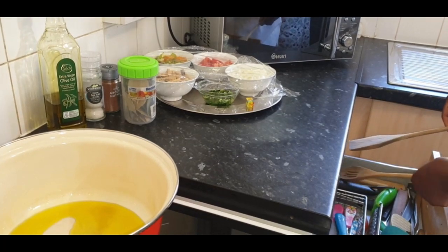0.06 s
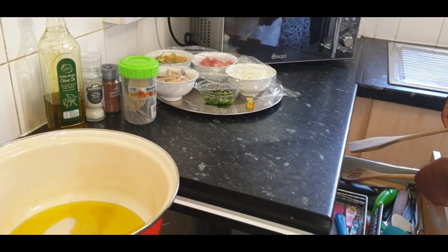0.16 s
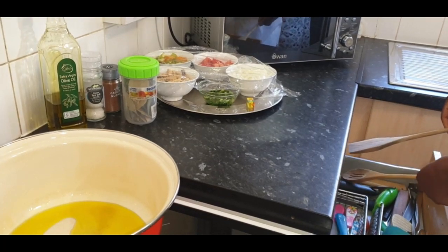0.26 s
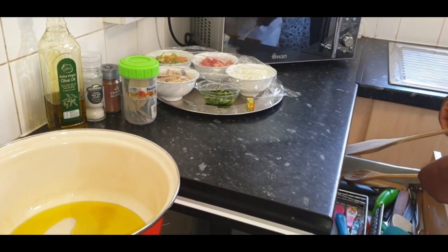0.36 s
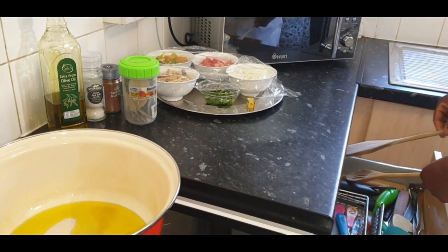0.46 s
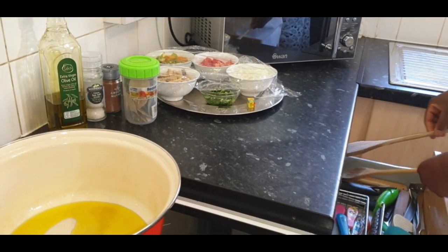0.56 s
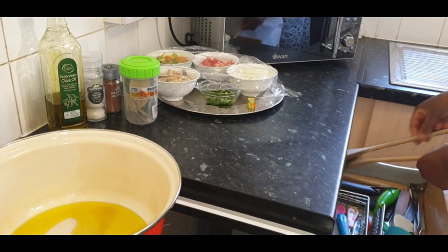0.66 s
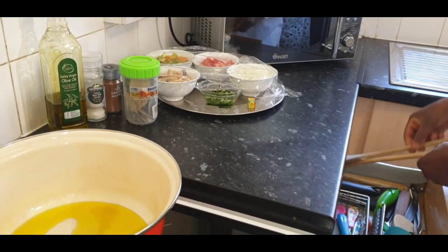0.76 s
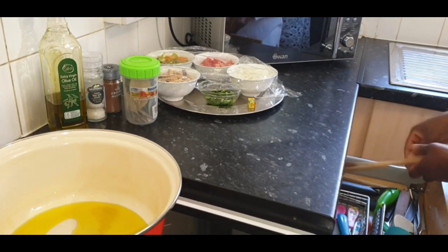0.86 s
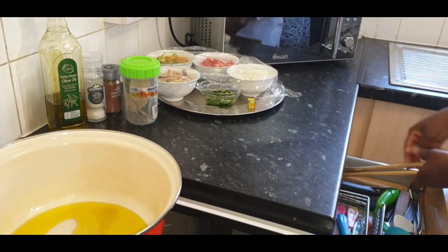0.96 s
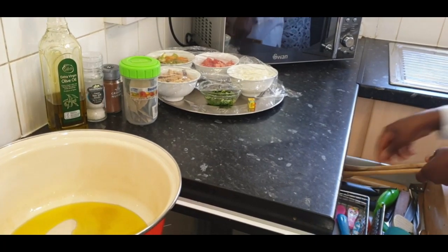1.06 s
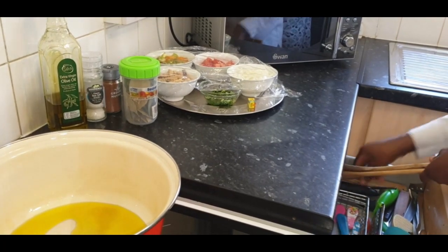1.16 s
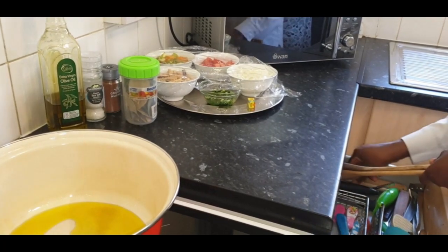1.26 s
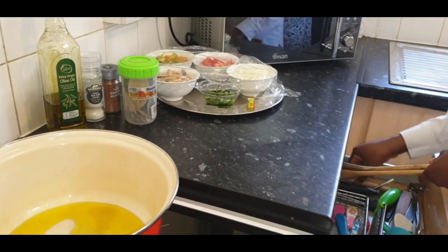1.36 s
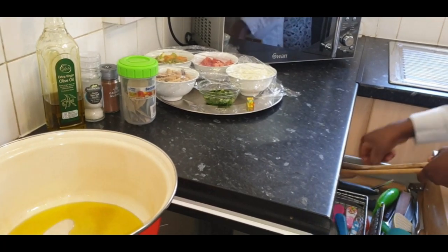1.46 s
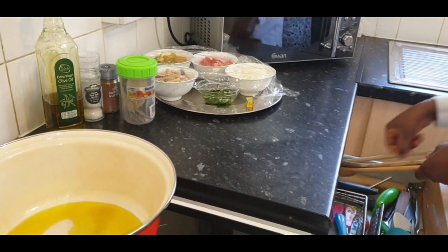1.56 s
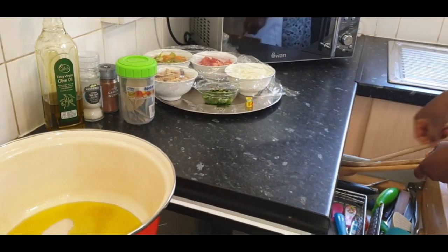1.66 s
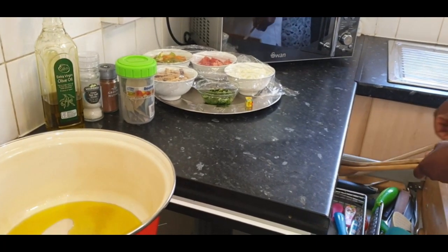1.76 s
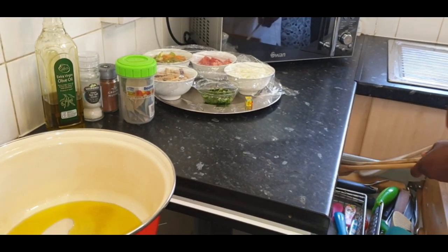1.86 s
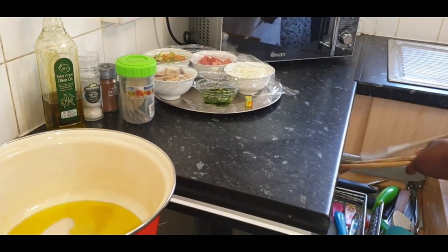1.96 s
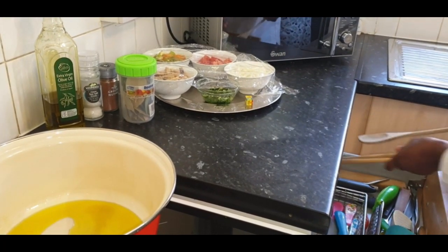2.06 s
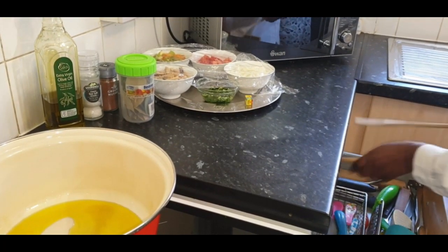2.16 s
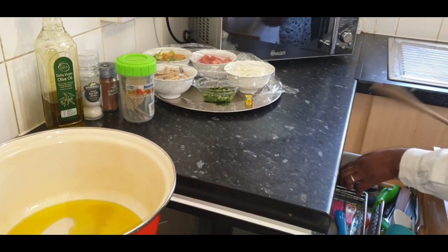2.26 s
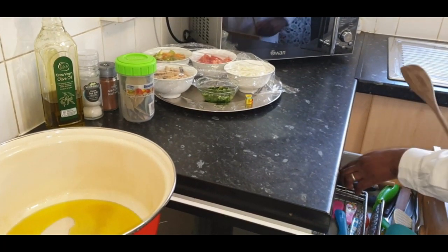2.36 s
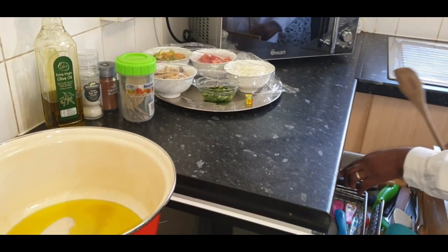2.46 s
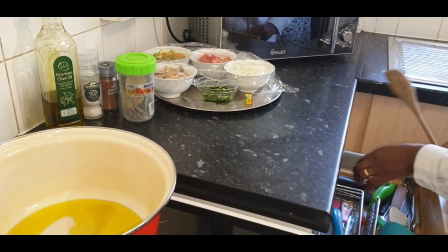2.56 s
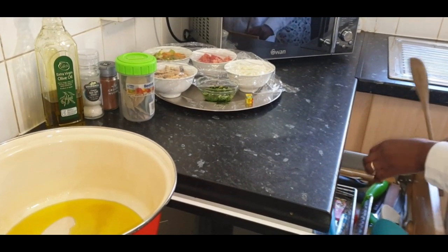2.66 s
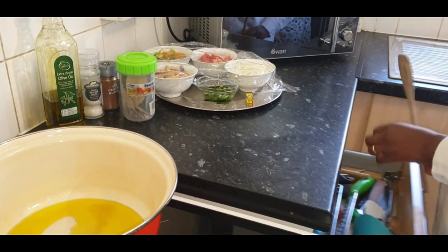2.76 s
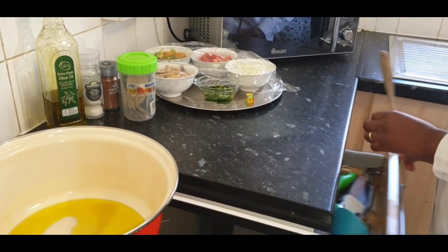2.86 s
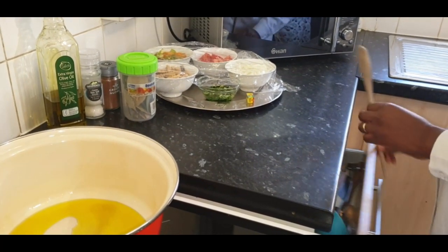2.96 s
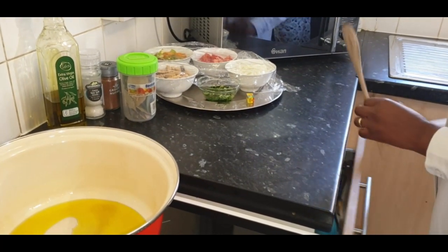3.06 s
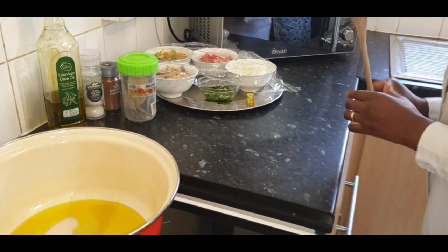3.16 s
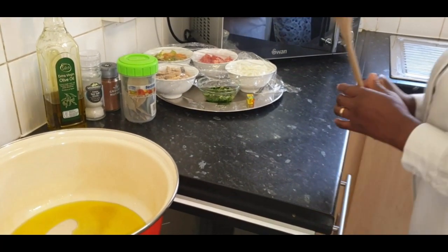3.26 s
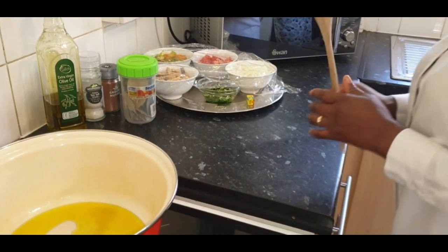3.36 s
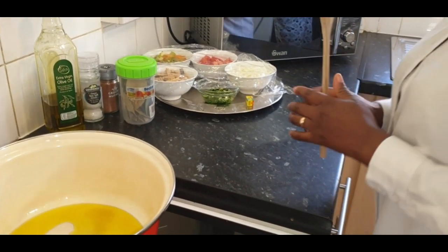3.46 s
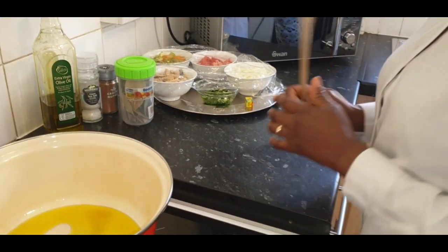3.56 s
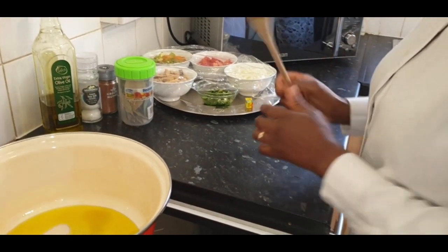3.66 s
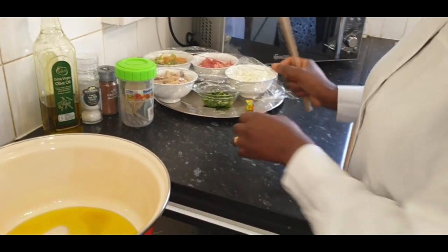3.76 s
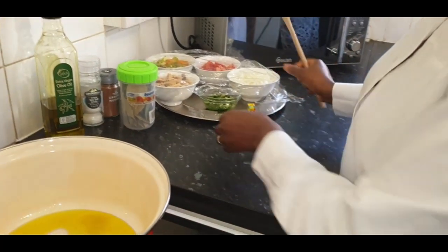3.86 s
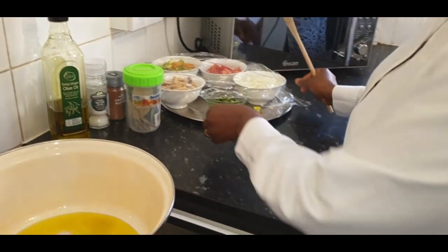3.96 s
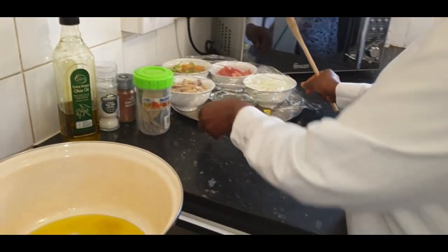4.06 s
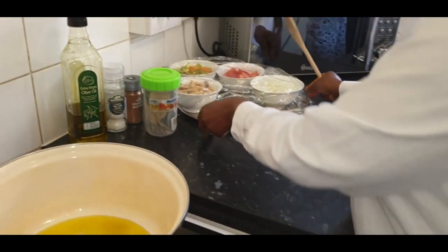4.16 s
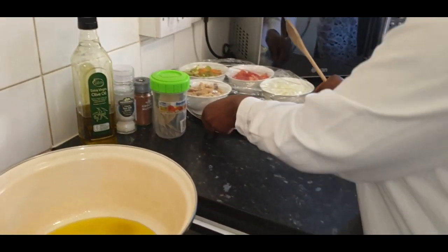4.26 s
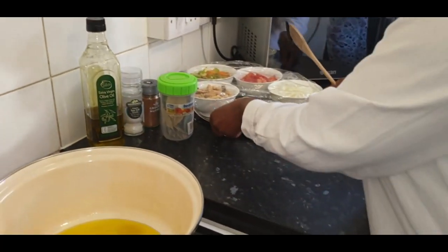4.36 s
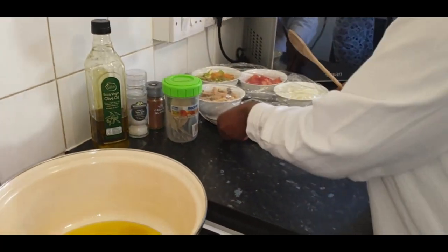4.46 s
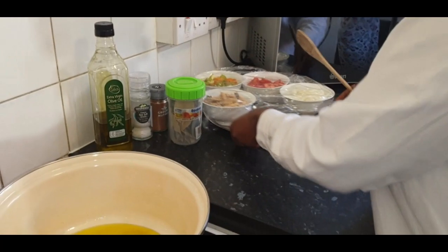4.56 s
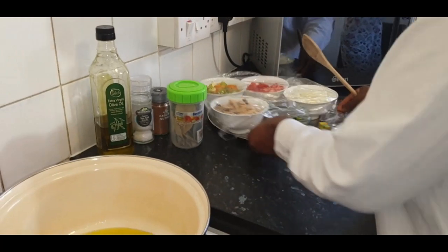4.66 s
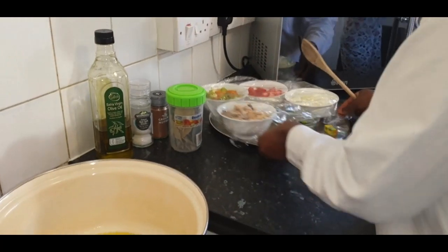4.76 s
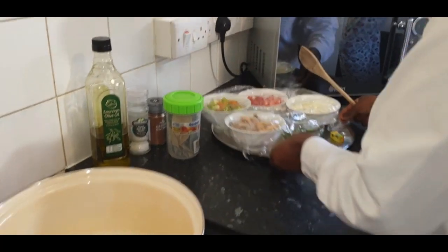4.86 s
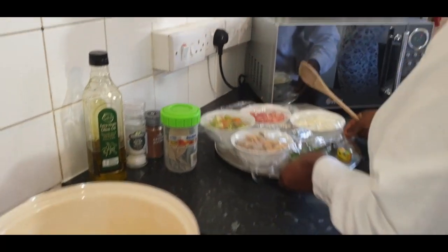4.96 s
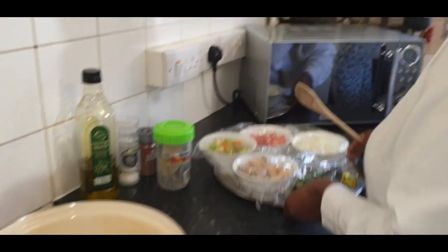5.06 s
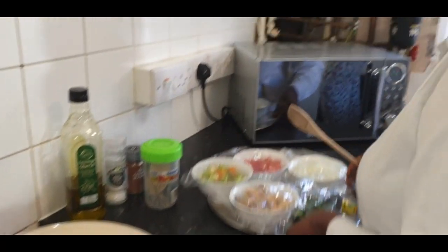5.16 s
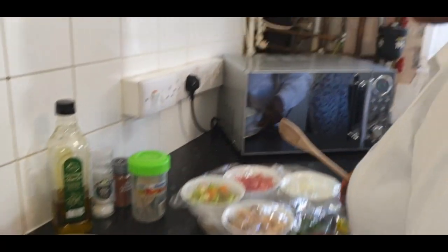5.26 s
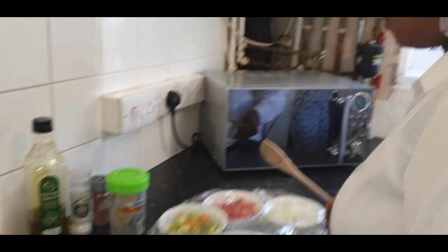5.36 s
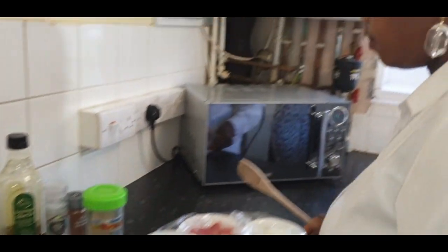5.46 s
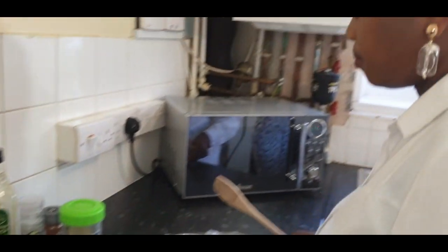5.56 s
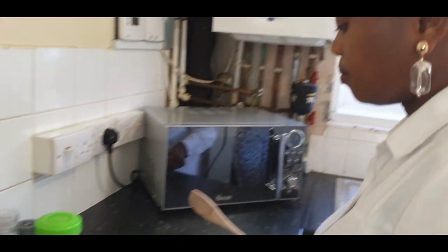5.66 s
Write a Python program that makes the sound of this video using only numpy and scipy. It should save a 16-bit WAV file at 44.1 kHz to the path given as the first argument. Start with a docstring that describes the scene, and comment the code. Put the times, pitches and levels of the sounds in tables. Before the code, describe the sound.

Hands rummage through metal and wooden utensils, push the drawer closed with a bang, then drag a film-covered tray of bowls off a worktop.

```python
"""In a small tiled kitchen, two close microphones hear a hand rummage among steel cutlery and wooden spoons
in a drawer, then push it shut: the runners roll, the cutlery surges and the front thuds home.
A steel tray of bowls under cling film is knocked and dragged off the worktop, over a wavering low hum.
Blows are uneven contacts that excite decaying modes or coloured noise bursts, slides are streams of tiny
slips, the hum is a gliding sine, and dense random reflections make the room."""
import sys
import numpy as np
from scipy import signal
from scipy.fft import rfft, irfft
from scipy.io import wavfile
from scipy.ndimage import uniform_filter1d

SR = 44100
rng = np.random.default_rng(int(sys.argv[2]) if len(sys.argv) > 2 else 0)


def digitize_waveform(pressure):
    """Quantize a signal to 16-bit integers and store it at the path in sys.argv[1].

    Rows of a 2-D input are taken as channels; values are limited to [-1, 1].
    """
    field = np.atleast_2d(pressure).T
    bounded = np.clip(field, -1, 1)
    quanta = np.round(bounded * 32767).astype(np.int16)
    wavfile.write(sys.argv[1], SR, quanta)


N = 252192
TAIL = 24576  # length of one blow or room response, in samples
AGE, TIME = np.arange(TAIL) / SR, np.arange(N) / SR  # seconds

# How hard the tray is dragged. Each row: time in seconds, level in dB before the share of film or scrape.
DRAG = [(4.45, -62), (4.62, -48), (4.68, -43), (4.844, -48), (4.958, -38), (5.22, -38.5), (5.32, -42.5),
        (5.53, -38), (5.719, -48)]
# Hands and sleeves brush past the tray. Each row: start in seconds, time held in seconds, rustle in dB,
# scrape in dB.
BRUSHES = [(3.557, 0.25, -62.5, -90), (3.903, 0.0076, -37, -37)]


def undb(db):
    """Decibels to gain."""
    return 10 ** (np.asarray(db) / 20)


def unit(x):
    """Scale to rms 1."""
    return x / np.sqrt(np.mean(x ** 2))


def fade(t60):
    """Exponential decay over one tail length, down 60 dB after t60 seconds."""
    return np.exp(-np.log(1000) * AGE / t60)


def curve(table, column=1):
    """One column of a table, joined by straight lines in time."""
    table = np.array(table)
    return np.interp(TIME, table[:, 0], table[:, column])


def gesture(start_s, attack_s, hold_s, release_db_per_s):
    """Gain of one movement: it builds up, holds and dies away."""
    age = TIME - start_s
    attack = np.clip(age / attack_s, 0, 1) ** 2
    return attack * undb(-release_db_per_s * np.maximum(age - attack_s - hold_s, 0))


def even(x, size):
    """Level the spectrum over neighbouring frequencies."""
    spectrum = rfft(x)
    power = uniform_filter1d(np.abs(spectrum) ** 2, size=size, axis=-1)
    return irfft(spectrum / np.sqrt(power))


def colour(x, points):
    """Causal (minimum-phase) filter whose gain follows (Hz, dB) points."""
    hz, db = np.transpose(points)
    size = x.shape[-1]
    grid = np.maximum(np.fft.rfftfreq(size, 1 / SR), 1)
    gain = undb(np.interp(np.log(grid), np.log(hz), db))
    # folding the cepstrum onto positive times makes the filter causal
    cepstrum = irfft(np.log(gain), size)
    cepstrum[1:size // 2] *= 2
    cepstrum[size // 2 + 1:] = 0
    return irfft(rfft(x) * np.exp(rfft(cepstrum)), size)


def stereo(mid, side):
    """Two close microphones: alike in the bass, further apart towards the treble."""
    # Colour of the side signal. Each row: frequency in Hz, gain in dB.
    width = [(60, -19.5), (250, -18), (550, -7.5), (1000, -1.5), (4500, 0.5), (13000, -15)]
    return mid + colour(side, width) * np.array([[1], [-1]])


def kitchen(direct_db):
    """Room response from one spot: direct sound, then dense reflections that lose their treble first."""
    low_t60_s, high_t60_s, split_hz, build_s = 0.4, 0.27, 6000, 0.00024
    noise = rng.standard_normal((2, TAIL))
    low = signal.sosfilt(signal.butter(2, split_hz, fs=SR, output="sos"), noise)
    high = noise - low
    tail = low * fade(low_t60_s) + high * fade(high_t60_s)
    tail *= 1 - np.exp(-AGE / build_s)
    tail /= np.sqrt(np.sum(tail ** 2, axis=1, keepdims=True))
    tail[0, 0] += undb(direct_db)  # against reflections of energy 1
    mid, side = even(tail, size=64) * (AGE < AGE[-1] * 3 / 4)
    return stereo(mid, side)


def ring(modes, detune=0.0028):
    """Decaying modes; each blow lands on another spot and weights them anew."""
    hz, db, t60 = np.transpose(modes)[:, :, None]
    weight_db, shift, sign = rng.standard_normal((len(modes), 3)).T[:, :, None]
    waves = np.sign(sign) * np.sin(2 * np.pi * hz * (1 + detune * shift) * AGE)
    return unit(np.sum(undb(db + weight_db) * waves * fade(t60), axis=0))


def clack(points, t60):
    """A blow on something with countless short-lived resonances: a coloured burst of noise."""
    burst = even(rng.standard_normal(TAIL) * fade(t60), size=400)
    return unit(colour(burst, points))


def steel_clack():
    """Steel on steel: a short burst, full in the upper middle."""
    # Colour of the dense resonances. Each row: frequency in Hz, gain in dB.
    steel_colour = [(500, -35.5), (1500, -1), (2500, 1.5), (4000, -1.5), (5300, -0.5), (7400, -6.5),
                    (9000, -16.5), (12000, -23), (16000, -44)]
    return clack(steel_colour, t60=0.013)


def heap(t60, crack_db, count=180):
    """Many forks and spoons touch at once: a sharp crack and a cloud of high partials."""
    # Colour of the fine jingle. Each row: frequency in Hz, gain in dB.
    jingle_colour = [(2000, -30.5), (6000, -10), (7400, 6.5), (8600, -3.5), (10500, 4), (12300, -6.5),
                     (13800, 3), (15300, -9), (16500, -23.5)]
    partials = np.zeros(TAIL // 2 + 1, complex)
    place, size, phase = rng.random((count, 3)).T
    hz = 5000 + 11000 * place
    partials[(hz * TAIL / SR).astype(int)] = size * np.exp(2j * np.pi * phase)
    cloud = unit(colour(irfft(partials) * fade(t60), jingle_colour))
    return cloud + undb(crack_db) * clack(jingle_colour, t60=0.0045)


def contacts(scatter_ms, uneven_db=5.5, slide_ms=37.0, count=12):
    """Uneven touches: a short blow starts hard and rebounds, a long slide swells in before it dies."""
    when, size = rng.random(count), rng.standard_normal(count)
    when = (np.arange(count) + when) / count
    when[0], size[0] = 0, 1
    slide = min(scatter_ms / slide_ms, 1)
    swell = (when + 1 / count) ** (2 * slide) * np.exp(-3 * when)
    force = swell * undb(uneven_db * size) * rng.choice([-1, 1], count)
    clicks = np.zeros(TAIL)
    np.add.at(clicks, (when * abs(scatter_ms) * SR / 1000).astype(int), force)
    return clicks


def strike(hits, body, room):
    """Each hit's contacts excite the body and the room; its level is its energy spread over 40 ms."""
    out, paths = np.zeros((2, N + TAIL)), rfft(room)
    for s, scatter_ms, hit_db in hits:
        # partly levelled, so that the sum of touches has no deep notches
        touch = rfft(contacts(scatter_ms))
        touch /= (np.abs(touch) + np.abs(touch).mean() / 2) ** (3 / 4)
        sound = irfft(touch * rfft(body()) * paths) * (AGE < AGE[-1] * 3 / 4)
        start = max(int(s * SR), 0)
        out[:, start:start + TAIL] += undb(hit_db) * unit(sound) * np.sqrt(.04 * SR / TAIL)
    return out[:, :N]


def grains(per_s, uneven_db, points, gain, room, clump_db=3, clumps_per_s=35):
    """A stream of tiny slips of uneven size that come in clumps, heard in the room."""
    chance, size, push = rng.random(N), rng.exponential(size=N), rng.standard_normal(N)
    drift = np.interp(TIME * clumps_per_s, np.arange(N), rng.standard_normal(N))
    sizes = undb(uneven_db * np.minimum(size, 5)) * undb(clump_db * drift)
    slips = (chance < per_s / SR) * np.sign(push) * sizes
    response = unit(colour(room, points)) / np.sqrt(TAIL)
    return signal.fftconvolve((unit(slips) * gain)[None], response, axes=1)[:, :N]


def background():
    """A low hum, a sine wavering in pitch and level, over faint rumble and air noise."""
    # Course of the hum, before and after the drawer shuts. Each row: time in seconds, pitch in Hz,
    # level in dB before a common 6 dB cut.
    hum_course = [
        [(0.0, 61.2, -39.5), (0.12, 64.56, -52), (0.91, 72.16, -52), (1.39, 62.15, -34), (2.2, 72.9, -43),
         (3.0, 80.4, -36)],
        [(3.62, 53.46, -37.5), (4.17, 55.2, -39.5), (4.46, 54.4, -27.5), (5.08, 57.8, -34), (5.19, 58, -55),
         (5.28, 61.1, -43), (5.58, 62.2, -30.5), (5.72, 64.3, -32)],
    ]
    # Colours of the room's air noise and of the rumble. Each row: frequency in Hz, gain in dB.
    air_colour = [(100, -13.5), (300, -5.5), (700, -29.5), (3000, -44.5), (9000, -40.5), (16000, -27.5)]
    rumble_colour = [(20, -21.5), (42, 0), (60, 13), (110, -2), (400, -46)]
    course = np.vstack(hum_course)
    phase = 2 * np.pi * np.cumsum(curve(course, column=1)) / SR
    hum = np.sqrt(2) * np.sin(phase) * undb(curve(course, column=2) - 6)
    air = unit(colour(stereo(*rng.standard_normal((2, N))), air_colour)) * undb(-68)
    rumble = unit(colour(stereo(*rng.standard_normal((2, N))), rumble_colour)) * undb(-50.5)
    return hum + air + rumble


def rummage():
    """Utensils knock, clack and jingle over the booming thin drawer bottom: the more steel, the brighter."""
    # Utensils knock together. Each row: start in seconds, scatter of the contacts in ms, level in dB before
    # the wood and steel offsets, share of steel from 0 to 1, fine jingle in dB.
    knocks = [ (0.002, 5.73, -40, 0.31, -50.5), (0.743, 4, -44.5, 0.87, -77),
              (0.829, 8.2, -28.5, 0.62, -56), (0.851, 11.8, -26.5, 0.57, -37),
              (0.888, 4.4, -26, 0.74, -27.5), (0.924, 36, -31.5, 0.59, -34),
              (1.227, 41.4, -33.5, 0.28, -55), (1.318, 70, -37.5, 0.46, -48), (1.401, 16, -30, 0.58, -30.5),
              (1.44, 46, -35, 0.6, -45), (1.484, 24.6, -25, 0.56, -29), (1.600, 50.7, -39, 0.44, -74),
              (1.708, 10.3, -32.5, 0.77, -35), (2.079, 29, -26, 0.43, -37.5), (2.145, 11.3, -29, 0.52, -46),
              (2.283, 13.5, -33, 0.63, -69), (2.308, 7.6, -20.5, 0.7, -28), (2.534, 4.8, -34.5, 0.48, -72),
              (2.67, 9.1, -29.5, 0.97, -33.5), (2.724, 3, -30, 0.9, -31.5)]
    # The hand bumps the drawer bottom. Each row: start in seconds, scatter in ms, level in dB.
    bumps = [(0.846, 2, -21), (0.868, 2.3, -22.5), (1.323, 8.06, -33), (1.350, 15.8, -30.5),
             (1.923, 9, -40), (1.945, 31.7, -36.5)]
    # Offsets in dB for wood on wood, then for steel on steel: drawer bottom, wood knock, steel clack.
    all_wood_db = (7.5, 3.5, -21.5)
    all_steel_db = (-13, -4, 7.5)
    # Modes of the drawer bottom. Each row: frequency in Hz, mean level in dB, t60 in seconds.
    bottom_modes = [(337, 0, .16), (334, -16, .7), (285, -13, .09)]
    # Colours of the bottom's board and of wooden spoons. Each row: frequency in Hz, gain in dB.
    board_colour = [(80, -20), (250, -3), (380, 0), (520, -11), (780, -12), (1200, -32), (4000, -60)]
    wood_colour = [(60, 2), (220, 5.5), (340, -1.5), (740, 8), (1200, -3), (2200, -4), (3500, -11),
                   (8000, -22.5), (16000, -33)]

    def bottom():
        return ring(bottom_modes) + undb(-14) * clack(board_colour, t60=0.042)

    def wood():
        return clack(wood_colour, t60=0.029)

    room = kitchen(direct_db=-6.0)
    under = kitchen(direct_db=3)
    s, scatter_ms, knock_db, share, jingle_db = np.transpose(knocks)
    out = strike(bumps, bottom, under)
    out += strike(zip(s, scatter_ms, jingle_db), lambda: heap(t60=0.038, crack_db=11.0), room)
    bodies, spaces = (bottom, wood, steel_clack), (under, room, room)
    for body, space, wooden_db, steely_db in zip(bodies, spaces, all_wood_db, all_steel_db):
        body_db = knock_db + np.interp(share, (0, 1), (wooden_db, steely_db))
        out += strike(zip(s, scatter_ms, body_db), body, space)
    return out


def film():
    """Cling film snaps, rustles and crackles under many tiny slips, and sleeves rustle with it."""
    # The film snaps. Each row: start in seconds, scatter of the contacts in ms, level in dB.
    snaps = [(4.643, 10.4, -45.5), (4.912, 7.3, -25.5), (5.582, 7.4, -35)]
    # Colours of a snap and of the rustle. Each row: frequency in Hz, gain in dB.
    snap_colour = [(100, 3), (500, 4), (1500, 7.5), (3000, 2), (14000, 3), (16500, -3)]
    rustle_colour = [(100, -2), (500, -15), (1500, -14.5), (3000, -15), (5000, -14.5), (13500, -11.5),
                     (16500, -25.5)]
    sleeves_from_s, sleeves_db = 0.734, -61.5  # faint rustle that stays
    drag = drag_gain()
    rustle = undb(-3) * drag + undb(sleeves_db) * (TIME > sleeves_from_s) + brush_gain(column=2)
    out = strike(snaps, lambda: colour(1. * (AGE == 0), snap_colour), kitchen(direct_db=0.0))
    out += grains(900, 2.7, rustle_colour, rustle, kitchen(direct_db=-1.0), clumps_per_s=30)
    # fine creases
    out += grains(180, 1.5, rustle_colour, undb(-5.5) * drag, kitchen(direct_db=3))
    pan_db = 2  # left minus right: the tray stands to the left
    return out * undb(np.array([[1], [-1]]) * pan_db / 2)


def drag_gain():
    """Gain of the drag, silent until it begins."""
    return undb(curve(DRAG)) * (TIME > DRAG[0][0])


def brush_gain(column):
    """Gain of the hands and sleeves brushing past, at the levels in one column of BRUSHES."""
    attack_s, release_db_per_s = 0.016, 182
    return sum(undb(row[column]) * gesture(row[0], attack_s, row[1], release_db_per_s) for row in BRUSHES)


def loose_pieces():
    """Single pieces lying free near the microphones: blade, teaspoon and ladle ring in their own modes."""
    # Blade clinks, teaspoon chinks and blows on a long steel utensil. Each row: start in seconds,
    # scatter of the contacts in ms, level in dB.
    blade_hits = [(0.802, 1.8, -45.5), (0.843, 1.8, -29)]
    spoon_hits = [(0.852, 4.7, -33), (0.888, 2.5, -27), (0.897, 3, -23), (0.922, 5, -25),
                  (1.234, 20, -33.5), (1.252, 28, -25)]
    ladle_hits = [(2.147, 4.4, -41), (2.308, 0.16, -19), (2.345, 0.16, -28)]
    # Modes of the three; the blade is damped at once. Each row: frequency in Hz, mean level in dB,
    # t60 in seconds.
    blade_modes = [(5240, -4, 0.0087), (9600, -15, 0.014)]
    spoon_modes = [(5160, -3, 0.036), (7320, 1, 0.085), (7770, 6, 0.047), (9510, 6, 0.082),
                   (10550, 5, 0.055), (11800, 3.5, 0.081), (13540, -10, 0.074), (13740, 9.5, 0.09)]
    ladle_modes = [(2117, 4, .32), (2628, -9, .14), (3449, 4, .32), (3478, -4, .22), (3523, -5, .28),
                   (5220, 4, .07)]
    near = kitchen(direct_db=4.0)
    out = strike(blade_hits, lambda: ring(blade_modes), near)
    out += strike(spoon_hits, lambda: ring(spoon_modes, detune=0.0043), near)
    out += strike(ladle_hits, lambda: ring(ladle_modes, detune=.0005), kitchen(direct_db=6))
    # the ladle's hard crack, against its clear ring
    return out + undb(-2) * strike(ladle_hits, steel_clack, kitchen(direct_db=-6.0))


def drawer():
    """The drawer rolls evenly on its runners, then its front cracks on the cabinet, whose panels boom."""
    # The front meets the cabinet and rebounds. Each row: start in seconds, scatter of the contacts in ms,
    # crack in dB, boom of the panels in dB.
    shut_hits = [(3.307, 7.14, -17.5, -38), (3.316, 6, -21.5, -11.5), (3.336, 8, -21, -36),
                 (3.392, 6, -30.5, -26)]
    # Modes of the cabinet panels. Each row: frequency in Hz, mean level in dB, t60 in seconds.
    cabinet_modes = [(74, -12, .36), (100, -13, .12), (141, 0, .16), (184, -9, .14)]
    # Colours of the crack and of the runners. Each row: frequency in Hz, gain in dB.
    cabinet_colour = [(40, -50), (70, 4), (140, 9.5), (370, 11.5), (750, 5.5), (1300, 0), (2700, -6),
                      (4200, -21.5), (16000, -44)]
    runner_colour = [(25, -21), (55, 7), (120, 2), (320, 3), (1200, -9), (2100, -9), (7000, -18),
                     (16000, -37.5)]
    # the push gets up to speed, rolls evenly, then slows until the drawer meets the cabinet
    push_s, attack_s, hold_s, brake_db_per_s, roll_db = 2.66, 0.069, 0.36, 68, -30
    room = kitchen(direct_db=3.0)
    rolling = gesture(push_s, attack_s, hold_s, brake_db_per_s) * (TIME < shut_hits[0][0])
    out = grains(3000, 1.5, runner_colour, undb(roll_db) * rolling, room, clump_db=1)
    s, scatter_ms, crack_db, boom_db = np.transpose(shut_hits)
    booms = zip(s, np.zeros_like(s), boom_db)  # one sharp push each
    out += strike(booms, lambda: ring(cabinet_modes), kitchen(direct_db=8))
    return out + strike(zip(s, scatter_ms, crack_db), lambda: clack(cabinet_colour, t60=0.028), room)


def surges():
    """The heap slides in the drawer: countless fine touches swell and die down, and set the forks ringing."""
    # The heap slides as the drawer starts, brakes and stops. Each row: peak in seconds, swell in seconds,
    # peak level in dB.
    slides = [(2.760, 0.029, -24.5), (3.09, 0.056, -11), (3.229, 0.018, -26.5), (3.368, 0.065, -22)]
    # Colour of the fine touches. Each row: frequency in Hz, gain in dB.
    heap_colour = [(200, 7), (2200, 5.5), (4500, 1), (7500, 1), (9000, 2), (11000, 4), (15500, 1.5)]
    depth_db = 18.5  # rise over one swell
    room = kitchen(direct_db=-1.5)
    gain = np.zeros(N)
    for s, swell_s, db in slides:
        gain += undb(db - depth_db * np.abs(TIME - s) / swell_s) * (TIME > s - swell_s)
    jingle = heap(t60=0.035, crack_db=-8, count=400)
    forks = signal.fftconvolve(room, jingle[None], axes=1)[:, :TAIL]
    touches = grains(4000, 2.5, heap_colour, gain, room, clump_db=1)
    return touches + undb(-5) * grains(4000, 2.5, heap_colour, gain, forks, clump_db=1)


def scraping():
    """Brushing hands and the dragged tray scrape in a stream of tiny slips."""
    # Colour of the scrape. Each row: frequency in Hz, gain in dB.
    scrape_colour = [(100, -0.5), (450, -5.5), (850, 4), (1700, 3), (4000, -19), (16000, -11)]
    scrape = undb(-2) * drag_gain() + brush_gain(column=3)
    return grains(300, 1.8, scrape_colour, scrape, kitchen(direct_db=-1.0), clump_db=2)


def tray():
    """The loaded tray knocks on the worktop and its bowls touch; softer blows excite less treble."""
    # Knocks. Each row: start in seconds, scatter of the contacts in ms, level in dB, hardness as the Hz
    # above which the knock falls off, 10 dB in an octave.
    tray_hits = [(4.250, 3.3, -26.5, 2420), (4.256, 6.2, -26, 1220), (4.268, 12.6, -27, 2050),
                 (4.291, 2.8, -29.5, 1230), (4.836, 22, -32, 675), (4.913, 7.4, -33, 1500)]
    # Modes of the tray. Each row: frequency in Hz, mean level in dB, t60 in seconds.
    tray_modes = [(156, -9, .05), (320, -4, .04), (670, 0, .03), (840, -2, .02)]
    # Colour of its dense resonances. Each row: frequency in Hz, gain in dB.
    tray_colour = [(40, -15), (130, 3), (420, -4), (750, -4), (1400, -6), (2400, -14), (3500, -30),
                   (16000, -38)]
    # Bowls shift and touch. Each row: start in seconds, pitch in Hz, level in dB.
    bowl_touches = [(4.539, 1774, -47.5), (4.645, 1483, -40), (5.001, 860, -36), (5.276, 830, -41),
                    (5.582, 1350, -36.5)]
    # Modes of a touched bowl. Each row: multiple of its pitch, mean level in dB, t60 in seconds.
    bowl_modes = [(0.999, 8, 0.049), (1.16, 3, 0.027)]

    def knock(hard_hz):
        sound = ring(tray_modes, detune=0.02) + undb(-2.5) * clack(tray_colour, t60=0.038)
        return colour(sound, [(hard_hz, 0), (2 * hard_hz, -10)])

    near = kitchen(direct_db=3)
    out = sum(strike([hit], lambda: knock(hard_hz), near) for *hit, hard_hz in tray_hits)
    for s, hz, db in bowl_touches:
        out += strike([(s, 3, db)], lambda: ring(np.array(bowl_modes) * (hz, 1, 1)), near)
    return out


def scene():
    """Everything in the kitchen."""
    return background() + rummage() + film() + loose_pieces() + drawer() + surges() + scraping() + tray()


def record(dry):
    """The two microphones differ a little in colour; the deepest bass is cut away, peaks clip, the top is cut."""
    # Left minus right. Each row: frequency in Hz, difference in dB.
    balance = [(60, 2), (1000, 0), (4500, -3.5), (8000, 1), (13000, 4.5)]
    low_cut_hz, top_hz = 31, 15900
    hz, db = np.transpose(balance)
    pair = np.array([colour(x, np.c_[hz, side * db / 2]) for x, side in zip(dry, (1, -1))])
    pair = signal.sosfilt(signal.butter(4, low_cut_hz, "high", fs=SR, output="sos"), pair)
    pair = np.clip(pair, -1, 1)
    return signal.sosfilt(signal.ellip(10, .2, 70, top_hz, fs=SR, output="sos"), pair)


dry = scene()
out = record(dry)
digitize_waveform(out)
```